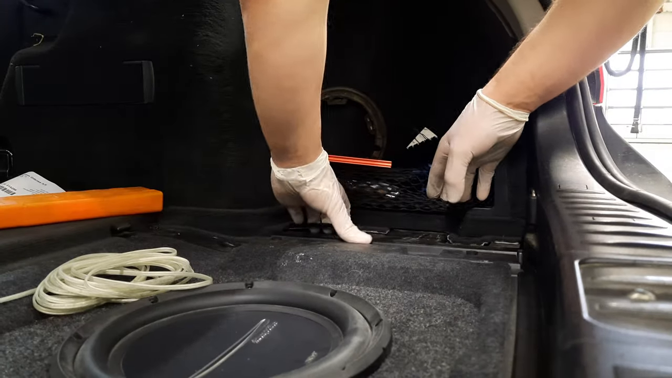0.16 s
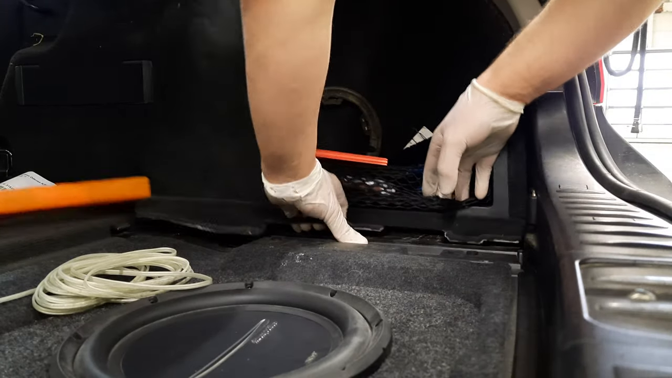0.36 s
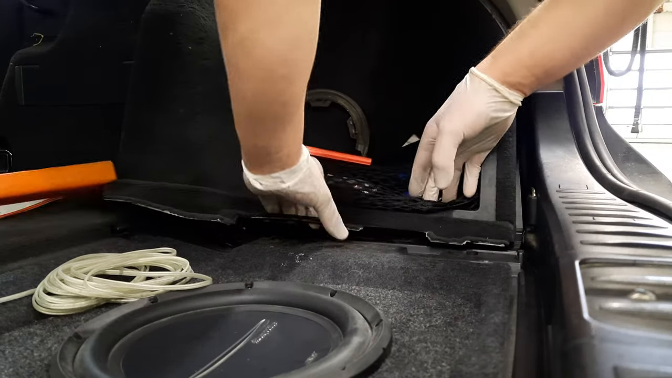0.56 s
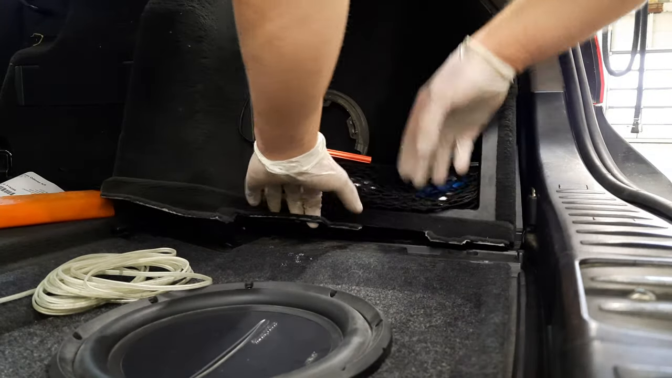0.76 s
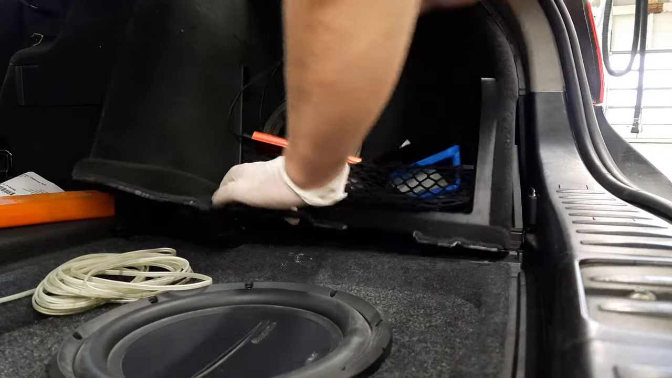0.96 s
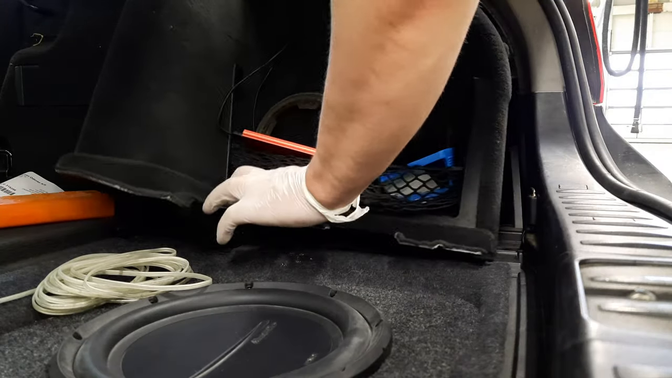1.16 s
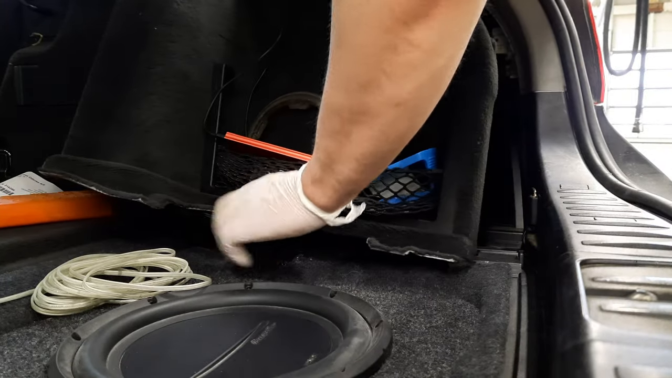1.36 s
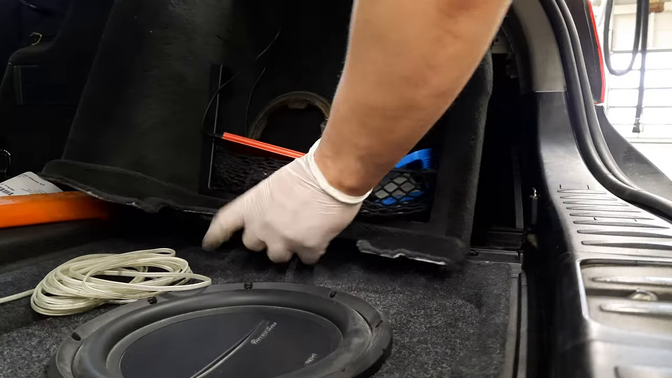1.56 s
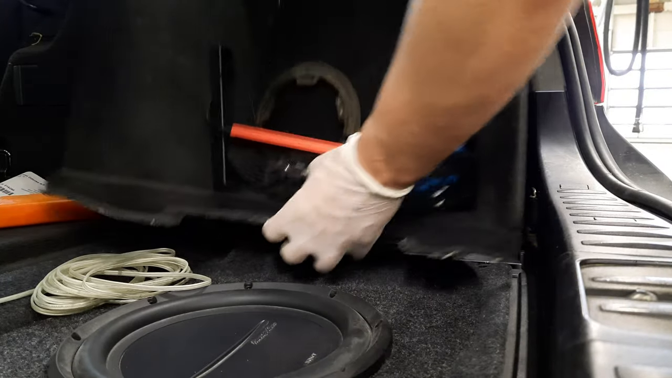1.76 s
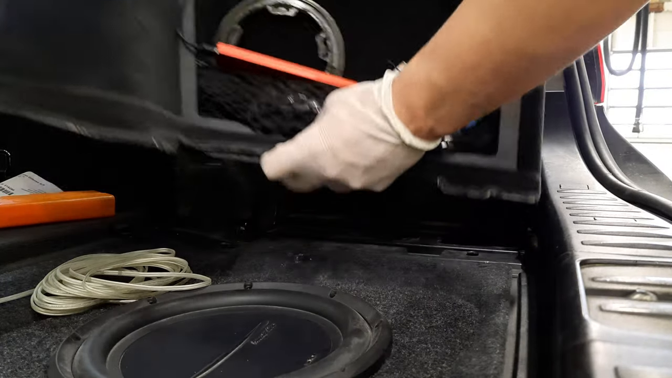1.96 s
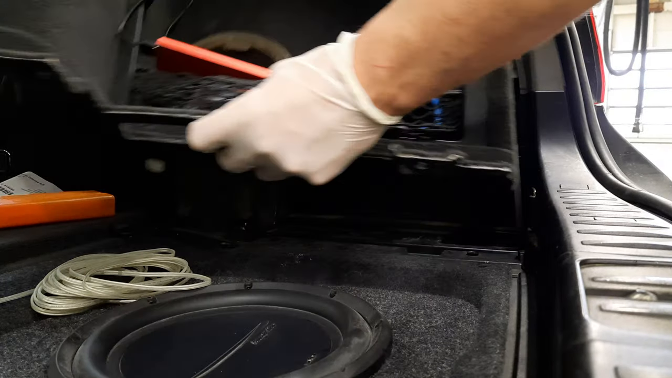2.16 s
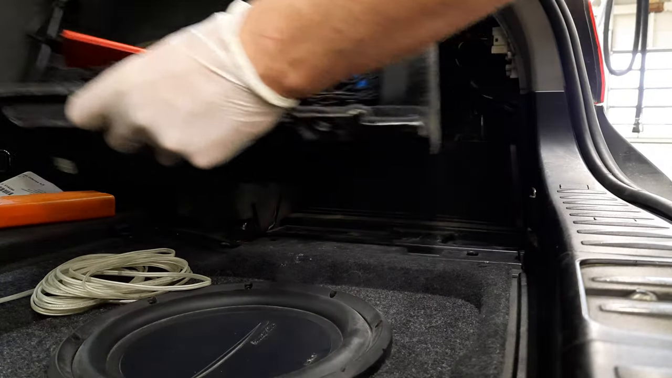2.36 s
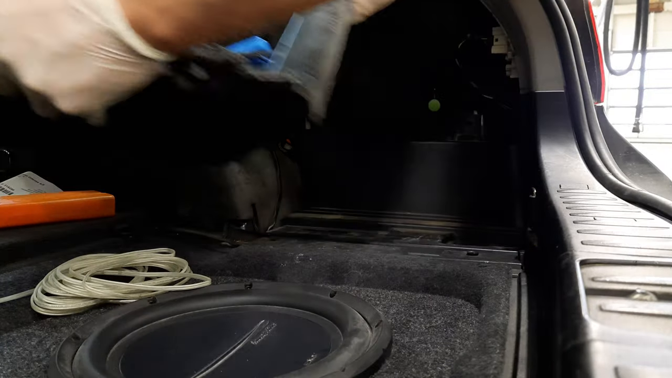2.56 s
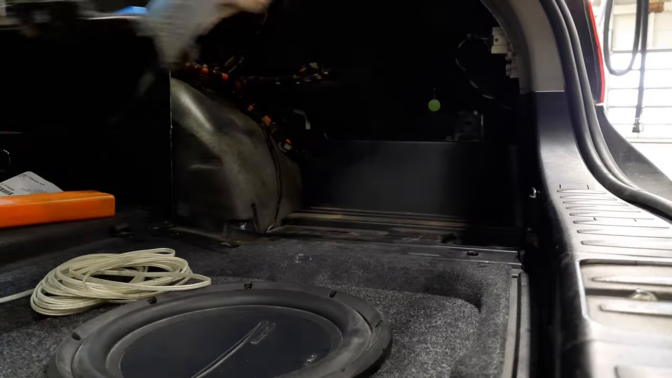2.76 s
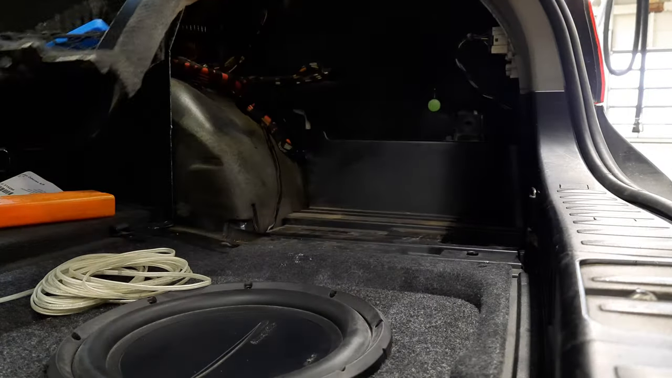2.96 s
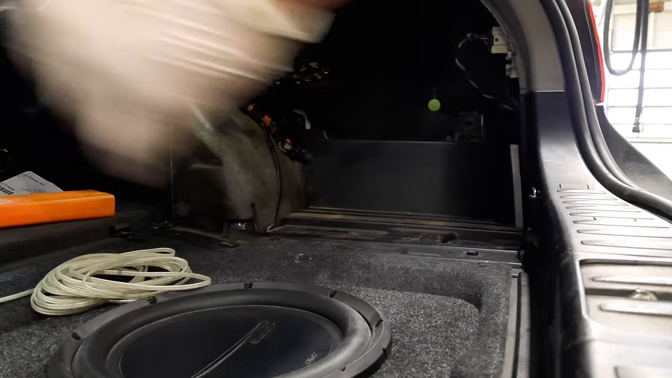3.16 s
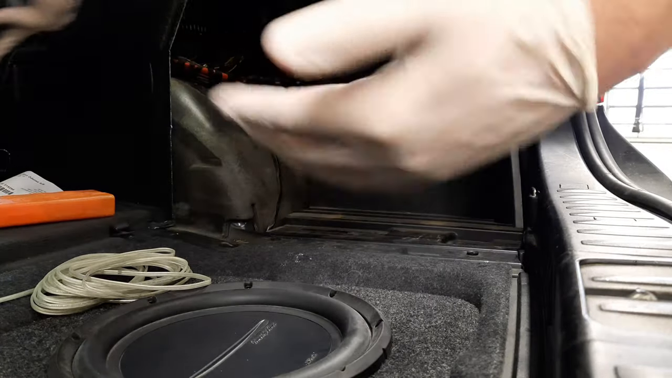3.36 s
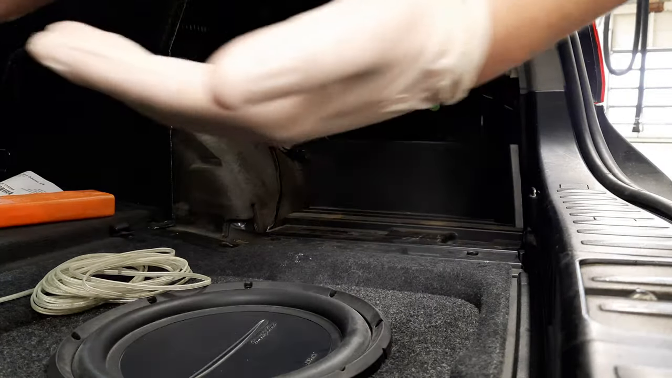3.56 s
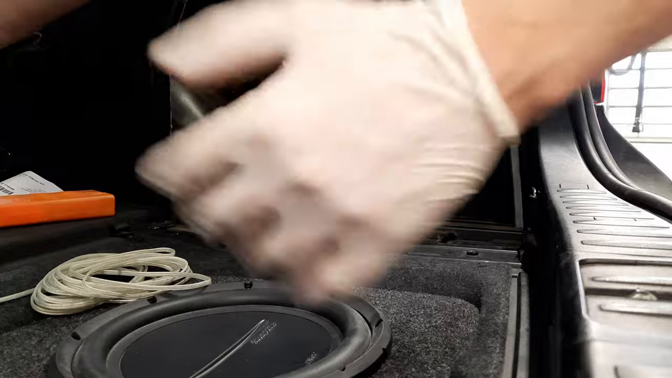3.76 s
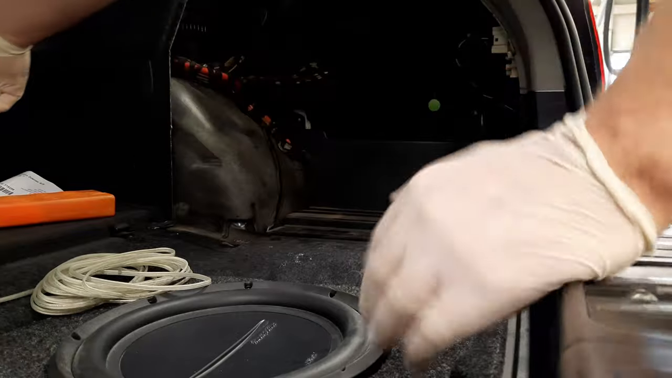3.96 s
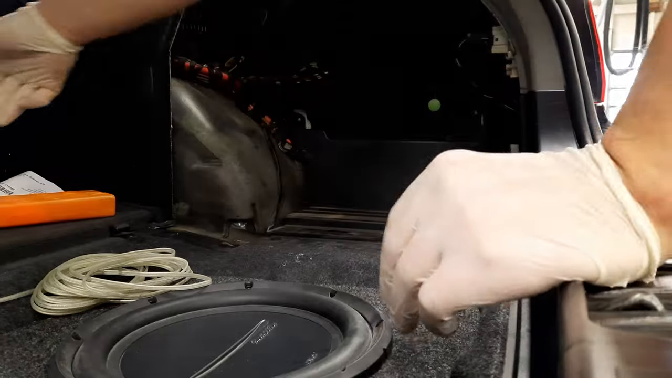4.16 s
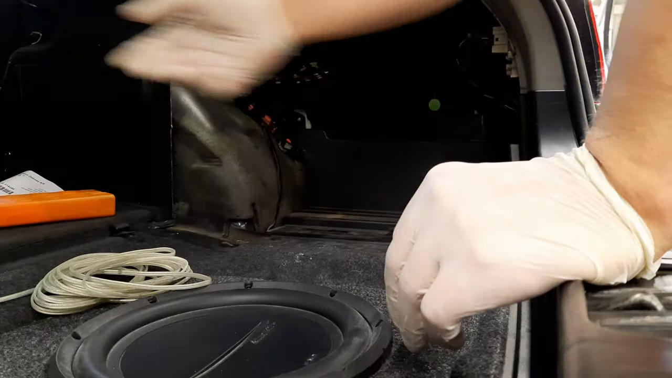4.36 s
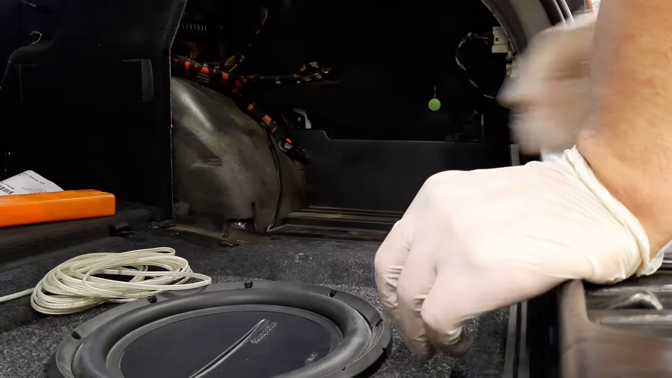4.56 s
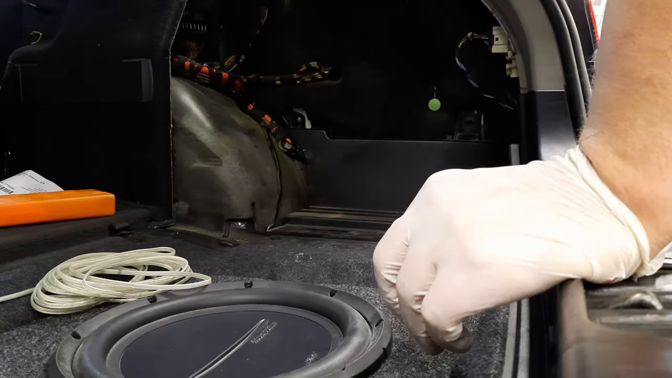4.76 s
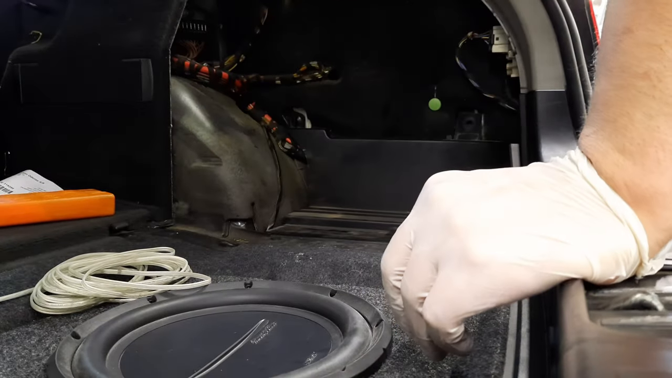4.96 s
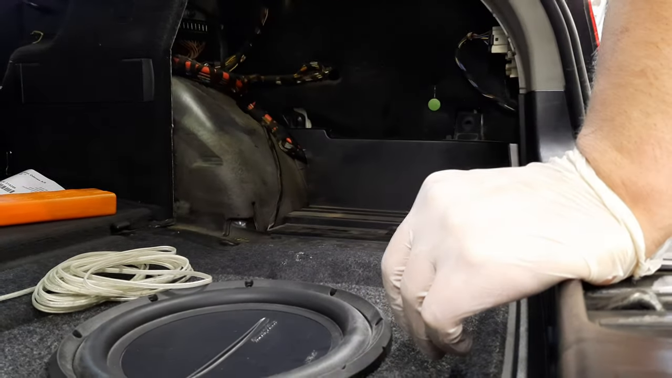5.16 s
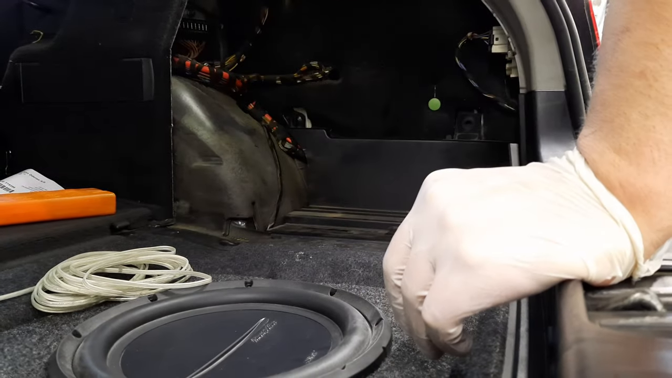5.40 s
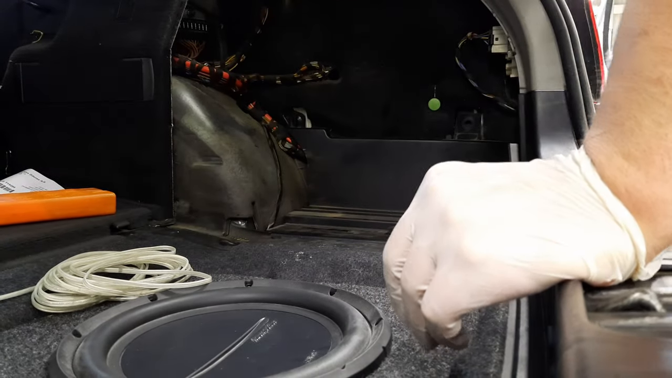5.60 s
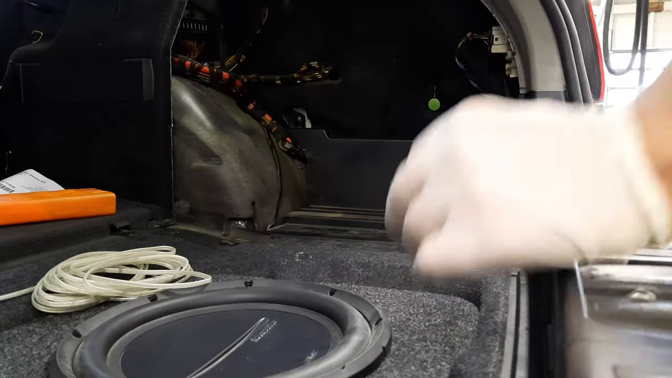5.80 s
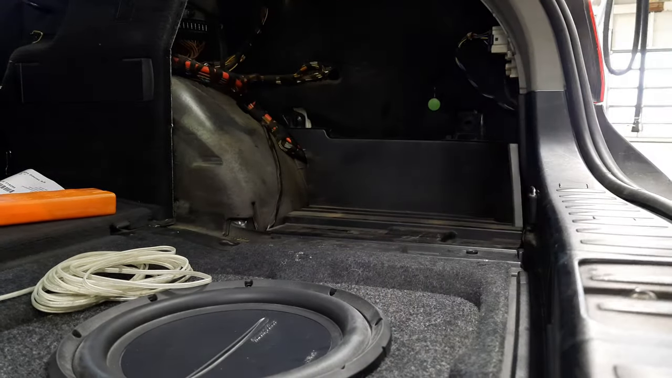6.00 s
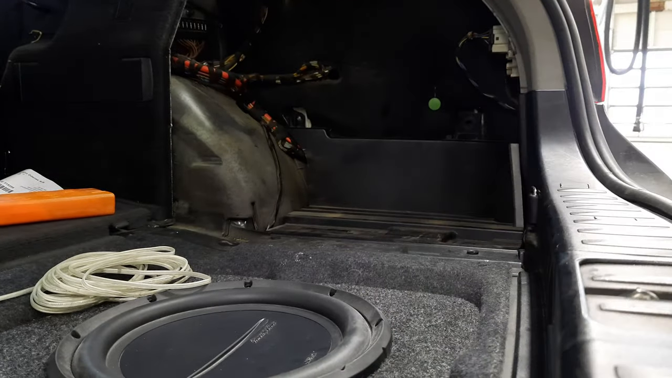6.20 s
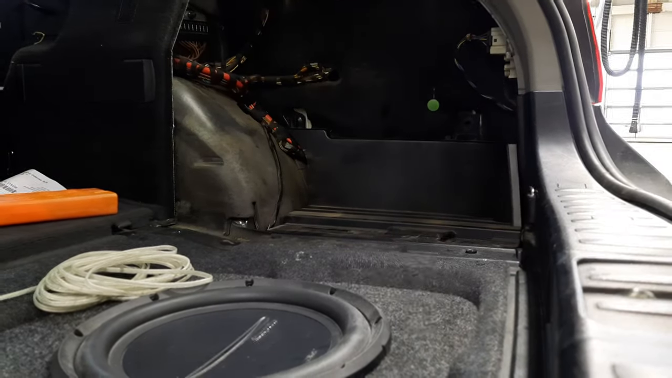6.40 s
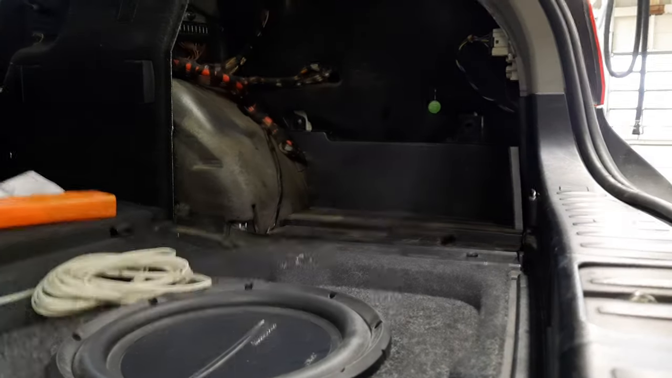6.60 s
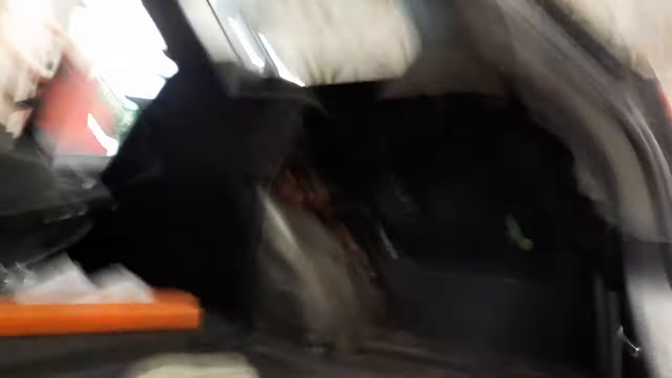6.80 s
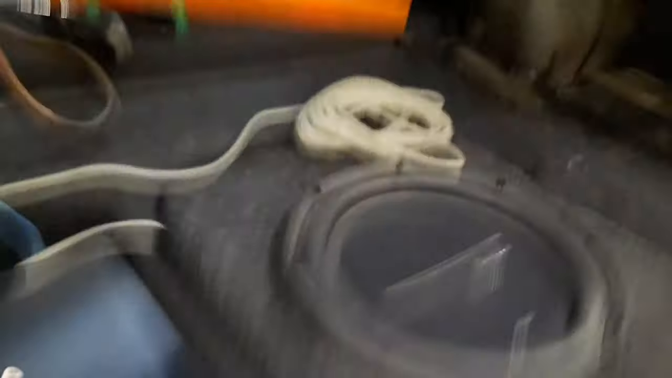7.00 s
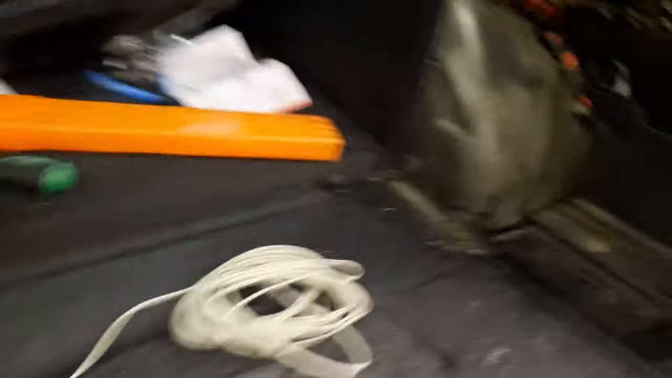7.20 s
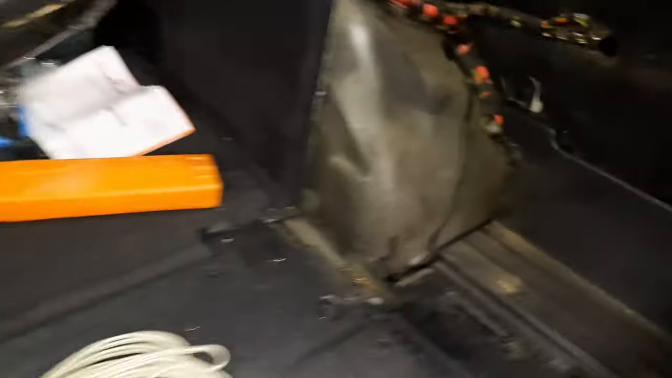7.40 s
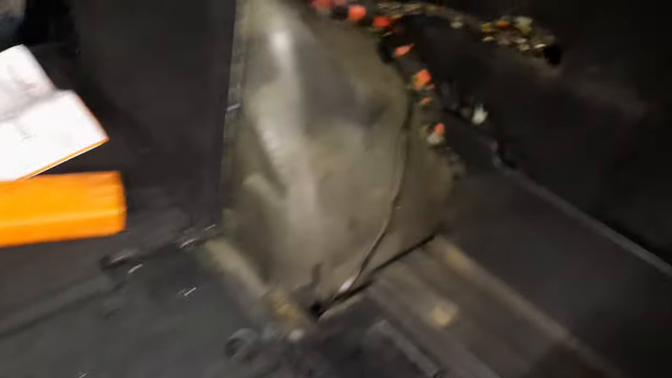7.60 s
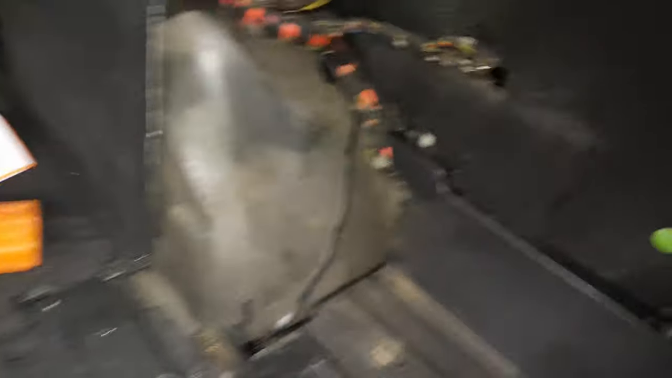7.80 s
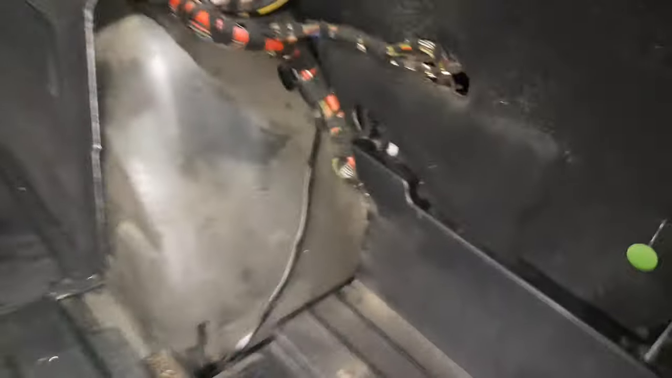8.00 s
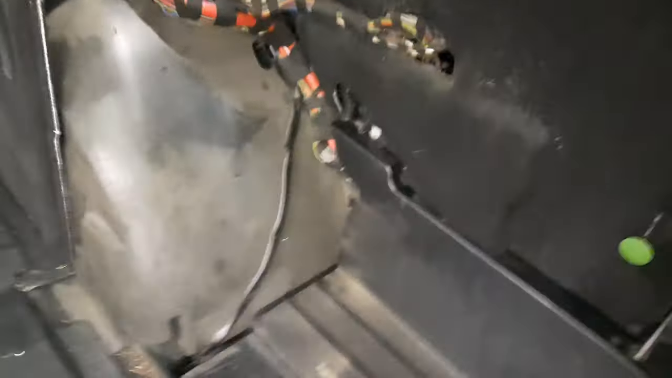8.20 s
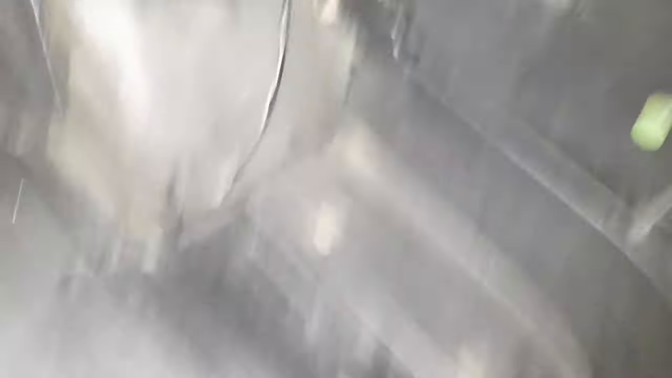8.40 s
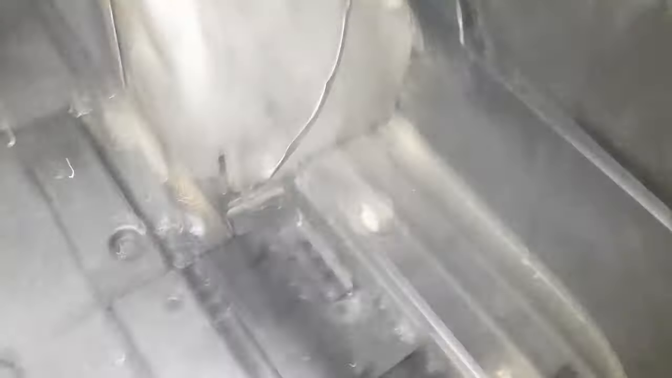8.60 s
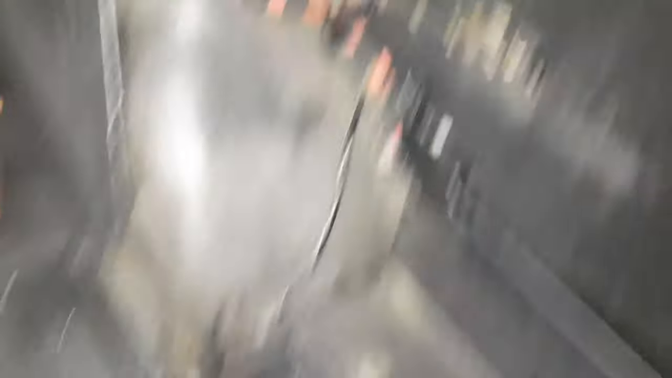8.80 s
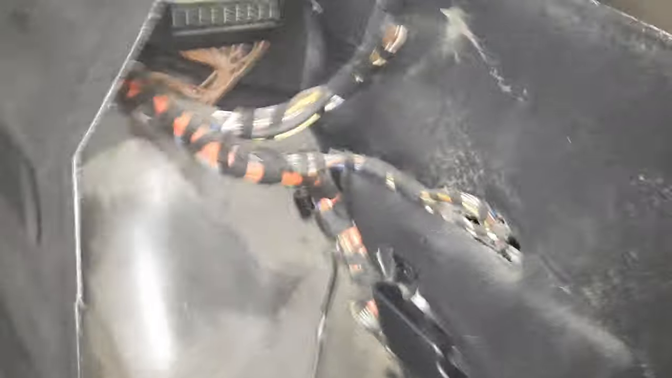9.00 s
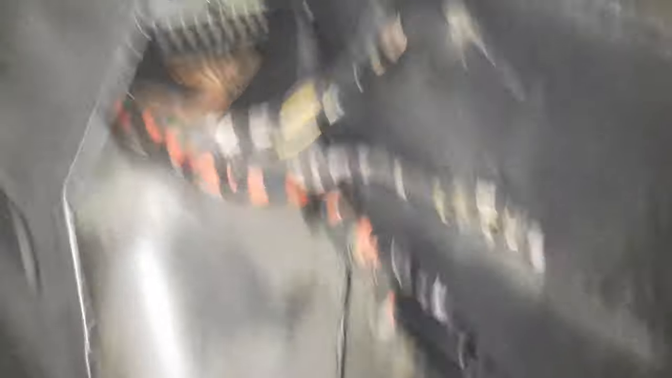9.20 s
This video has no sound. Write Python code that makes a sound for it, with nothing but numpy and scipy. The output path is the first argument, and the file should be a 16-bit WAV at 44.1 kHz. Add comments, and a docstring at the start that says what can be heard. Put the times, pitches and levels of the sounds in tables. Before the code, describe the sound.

Inside a car boot, a carpeted plastic panel is tugged loose with a flurry of hollow knocks, snapping clips and short scrapes. After a quieter moment it is put down with a thud and a clatter, and a few more knocks follow. Then fingers bump loudly and rub right on the microphone, mostly on the left. A low workshop drone runs underneath throughout.

```python
"""In a car boot, a carpeted plastic side panel is tugged loose, lifted out and put down.
Its knocks ring the floor, skin and rim; clips flick free, its edge scrapes, a glove brushes the carpet.
Then a phone is picked up: fingers bump its case and rub over its two microphone ports.
A low workshop drone resonates in the boot throughout."""
import sys
import numpy as np
from scipy import signal
from scipy.fft import rfft, irfft, next_fast_len
from scipy.io import wavfile
from scipy.ndimage import uniform_filter1d

SR = 44100
rng = np.random.default_rng(int(sys.argv[2]) if len(sys.argv) > 2 else 0)


def waveform_to_disk(signal):
    """Save audio, clipped to [-1, 1], as 16-bit WAV at the path in sys.argv[1]."""
    frames = np.transpose(np.atleast_2d(signal))
    scaled = np.clip(frames, -1, 1) * 32767
    samples = np.round(scaled).astype(np.int16)
    wavfile.write(sys.argv[1], SR, samples)


N = 407925
TIME = np.arange(N) / SR
HIT_TIME = np.arange(int(0.3 * SR)) / SR

# Modes of floor, panel skin, rim and clips: (frequency [Hz], level [dB], free t60 [s])
FLOOR_MODES = [(58, -12, 0.2), (76, 4, 0.16), (93, 2, 0.17), (111, 1, 0.14), (135, -1, 0.14),
               (164, 0, 0.09), (190, 1, 0.06), (222, 1, 0.06)]
SKIN_MODES = [(251.6, -2, 0.11), (312.3, 2.5, 0.13), (344.6, -5, 0.16), (396, -0.5, 0.065),
              (439, -2.5, 0.042), (486.4, -1.5, 0.077), (523, 4, 0.057), (595, 2.5, 0.084)]
RIM_MODES = [(697, 1, 0.079), (834, 8, 0.035), (891, 3, 0.069), (975, 3, 0.066), (1055, 6.5, 0.055),
             (1213, 2, 0.058), (1412, 3.5, 0.035), (1675, 1, 0.076)]
CLIP_MODES = [(1938, 16, 0.16), (2344, 8, 0.21), (2784, 11, 0.22), (3490, 12, 0.3), (3910, 5.5, 0.093),
              (4190, 13, 0.066), (5020, 16, 0.033), (5850, 3, 0.021), (7440, 25, 0.013), (7000, -2, 0.026)]
# Hard plastic snap: (frequency [Hz], density [dB])
SNAP_SPECTRUM = [(1000, -1), (1700, 3), (2500, 2.5), (3400, -2), (5000, -3.5), (7600, -8.5), (9300, -12.5),
                 (12500, -13), (16000, -16.5)]
# Position of the flexing skin: (time [s], left minus right [dB])
PANEL_PAN = [(0.5, 5.5), (1.7, 1.5), (3.7, 4), (4.05, 7), (5.1, 10), (5.8, 7.5)]
# Panel blows: (time [s], floor boom [dB], boom centre [Hz], skin flex [dB], flex centre [Hz],
# rim clack [dB], clack centre [Hz], edge snap [dB], snap tilt [dB/octave])
KNOCKS = [(0.0552, -30, 150, -25.5, 365, -34, 800, -31, 2.5),
          (0.252, -54, 171, -26.5, 312, -45, 700, -66, -14),
          (0.355, -29, 95, -27.5, 352, -35, 850, -39.5, 1), (0.39, -27, 90, -33, 400, -34, 850, -47, -4),
          (0.408, -26, 140, -23.5, 342, -32.5, 900, -27, -1), (0.478, -32, 130, -36, 477, -40, 800, -52, 2),
          (0.496, -20.5, 103, -34, 350, -44, 750, -46, 2), (0.586, -30, 95, -30.5, 543, -37, 760, -53, -8),
          (0.6304, -21.5, 165, -20, 350, -18.5, 1030, -27, -6.5),
          (0.634, -36, 190, -20, 600, -22.5, 1000, -34, -11), (0.656, -35, 170, -28, 320, -50, 800, -55, 2),
          (0.728, -15.5, 85, -17.5, 527, -26, 980, -29, -5),
          (0.7351, -18.5, 125, -29, 326, -32, 1100, -36.5, -1),
          (0.752, -25, 80, -30, 450, -32, 1100, -36.5, -2), (0.767, -25, 79, -33, 527, -41, 800, -52, -4),
          (0.79, -22.5, 76, -33.5, 486, -51, 800, -44, -1),
          (1.0132, -29, 141, -21, 308, -25, 704, -32.5, -3),
          (1.038, -23.5, 112, -27.5, 317, -51, 800, -60, -10),
          (1.055, -25, 120, -34.5, 380, -36, 1400, -50, -9),
          (1.072, -24, 115, -28.5, 324, -28.5, 1150, -40, -7),
          (1.379, -38, 120, -34.5, 335, -43, 800, -47, -10),
          (1.401, -25, 115, -27, 453, -34, 800, -33.5, -12),
          (1.546, -44, 150, -41.5, 317, -60, 765, -66, -10),
          (1.672, -28, 155, -19.5, 340, -35, 726, -42.5, -3.5),
          (1.679, -44, 190, -28.5, 500, -39.5, 800, -46, -1.5),
          (1.7, -37, 150, -30.5, 313, -57, 900, -60, -5),
          (1.753, -47, 170, -18, 273, -33, 760, -39.5, -4.5),
          (1.773, -30.5, 200, -27.5, 574, -32, 900, -42, -2.5),
          (2.567, -38.5, 110, -38.5, 302, -56, 750, -57, 1), (2.713, -47, 110, -44, 330, -51, 750, -47, 9),
          (2.745, -44, 110, -42, 368, -46, 800, -41.5, 5.5),
          (2.771, -55, 110, -37.5, 370, -45.5, 800, -43, 0.5),
          (2.837, -39, 110, -37.5, 320, -45, 750, -41, 4),
          (3.7165, -13.5, 117, -23, 245, -40.5, 700, -42, 2),
          (3.771, -16, 80, -39.5, 280, -45.5, 700, -59, -5),
          (3.792, -33, 125, -39, 500, -41, 796, -47, -0.5),
          (4.001, -48, 140, -39, 524, -41, 1100, -32.5, 2.5),
          (4.0077, -44, 140, -30.5, 405, -35.5, 900, -31.5, 5.5),
          (4.0106, -40, 200, -14.5, 303, -26, 850, -28, -2.5),
          (4.016, -50, 140, -21, 383, -26.5, 880, -31, -5), (4.04, -53, 140, -29, 310, -39.5, 750, -41, -6),
          (4.048, -38, 140, -28, 330, -29, 750, -40, -6), (4.056, -57, 140, -33, 400, -39, 900, -42, 2),
          (4.0641, -42, 140, -34, 400, -24.5, 950, -32.5, 1.5),
          (4.075, -48, 140, -31, 480, -33.5, 1000, -33, -5),
          (4.086, -30.5, 136, -20.5, 332, -24.5, 850, -33.5, 2),
          (4.107, -52, 140, -35.5, 350, -36.5, 800, -33.5, 1.5),
          (4.115, -55, 140, -36.5, 400, -39.5, 850, -36, 2),
          (4.1311, -48, 140, -43, 353, -31.5, 800, -36, -1.5),
          (4.154, -40, 190, -22.5, 336, -26.5, 900, -28.5, 1),
          (4.2778, -66, 187, -29, 456, -30, 910, -33, 2.5),
          (4.418, -69, 190, -29, 400, -29, 844, -28.5, -1.5),
          (5.02, -45, 180, -29.5, 338, -30, 800, -26.5, 3), (5.037, -55, 180, -38, 400, -39, 1100, -43, -3),
          (5.064, -54, 180, -30, 404, -30, 900, -29, 0), (5.0782, -52, 180, -40, 340, -34.5, 800, -30, 2),
          (5.18, -44, 190, -27, 326, -28.5, 795, -27, 1),
          (5.7398, -28, 185, -25, 403, -19, 960, -25.5, 2.5),
          (5.743, -38, 200, -12, 307, -36, 750, -36, -9), (5.765, -55, 180, -26, 310, -40.5, 750, -38, -3),
          (5.778, -50, 180, -41, 330, -32, 750, -33, -2), (5.798, -55, 180, -44, 380, -40, 800, -36, -9),
          (5.805, -48, 150, -28, 362, -30, 800, -33, 2.5), (5.825, -52, 150, -26, 347, -32, 800, -33.5, 2),
          (5.8402, -40, 150, -22, 312, -28, 860, -32, 0),
          (5.852, -39, 150, -29.5, 423, -33.5, 900, -38, -2),
          (5.859, -32.5, 150, -29, 308, -33, 750, -39, -6)]


def panel_knocks():
    """A blow shakes the floor, flexes the panel, rings its rim and snaps at the hard contact."""
    out = np.zeros((2, N))
    weak_mode_spectrum = [(400, 20.5), (650, 16), (1100, 6.5), (1700, 7.5), (2600, -33.5)]
    for s, boom_db, boom_hz, flex_db, flex_hz, clack_db, clack_hz, snap_db, tilt_db in KNOCKS:
        rim_noise, snap_noise = rng.standard_normal((2, 2, len(HIT_TIME)))
        boom = ring(FLOOR_MODES, focus(FLOOR_MODES, boom_hz, db_per_octave=12),
                    rise_s=0.0065, scatter_db=1.5, detune=0.039, apart_hz=610, disorder=0.32)
        flex = ring(SKIN_MODES, focus(SKIN_MODES, flex_hz, db_per_octave=20.5),
                    rise_s=0.0012, scatter_db=1.5, detune=0.025, apart_hz=950, disorder=0.27)
        rim = ring(RIM_MODES, focus(RIM_MODES, clack_hz, db_per_octave=9.5),
                   rise_s=0.00098, scatter_db=0, detune=0.028, apart_hz=1370)
        weak_modes = colour(rim_noise, weak_mode_spectrum, alike_hz=874)
        weak_modes *= fade(rise_s=0.00052, t60_s=0.14, tail_db=-15, tail_t60_s=0.19)
        clack = at_level(at_level(rim, 0) + at_level(weak_modes, -7), clack_db)
        snap = at_level(edge_snap(snap_noise, tilt_db), snap_db)
        boom = at_level(boom * decay(0.45), boom_db, span_s=0.11)  # damped by the carpet
        flex = at_level(flex * decay(0.4), flex_db, span_s=0.065)  # damped by the hand
        # the skin gives way later in a soft blow, where flex outweighs clack
        give_s = 0.00685 * np.clip((flex_db - clack_db) / 9, 0, 1) ** 2
        add(out, s, pan(boom, 3.4) + pan(clack, 7) + pan(snap, 2.2))
        add(out, s + give_s, pan(flex, np.interp(s, *np.transpose(PANEL_PAN))))
    return out


def edge_snap(noise, tilt_db):
    """A struck edge cracks, skids and catches twice more, and rings the clips that it damps."""
    crack = colour(noise, SNAP_SPECTRUM, alike_hz=700, tilt_db=tilt_db)
    crack *= fade(rise_s=0.0018, t60_s=0.013, tail_db=-20, tail_t60_s=0.08)
    clip_octaves = np.log2(np.array(CLIP_MODES)[:, 0])
    ping = ring(CLIP_MODES, tilt_db * clip_octaves,
                rise_s=0.0036, scatter_db=3, detune=0.054, apart_hz=1550)
    skid_lags_s = 0.0098 * rng.uniform(0.2, 1, 2)
    skids = sum(np.pad(crack, ((0, 0), (int(s * SR), 0)))[:, :len(HIT_TIME)] for s in skid_lags_s)
    return at_level(crack + undb(-14) * skids, -0.3) + at_level(ping * decay(0.045), -6.5)


# Modes of a clip's prong: (frequency [x pitch], level [dB], t60 [s])
PRONG_MODES = [(1, 11, 0.036), (1.5, -12, 0.032), (2.8, -26, 0.015)]
# Clips flicking free: (time [s], level [dB], pitch [Hz], prong re click [dB])
FLICKS = [(0.305, -39, 3700, -17), (0.534, -29.5, 2680, -11), (0.792, -35.5, 3770, -6),
          (1.12, -51, 2100, -5), (1.509, -43, 2950, -23), (1.646, -44.5, 2980, -19),
          (2.125, -54.5, 7100, -10), (2.58, -53.5, 2670, 0), (2.8362, -38, 2530, -3),
          (4.182, -66, 5800, -5), (5.707, -43, 1290, -10), (5.9133, -33.5, 2570, -2.5),
          (6.351, -56, 2640, -21), (8.551, -46, 3000, -7)]


def clip_flicks():
    """A freed clip cracks, rings briefly at its own pitch and shakes the edges around it."""
    out = np.zeros((2, N))
    for s, db, hz, prong_db in FLICKS:
        crack_noise, body_noise = rng.standard_normal((2, 2, len(HIT_TIME)))
        crack = colour(crack_noise, SNAP_SPECTRUM, alike_hz=700, tilt_db=4.5 * np.log2(hz / 4000))
        crack *= fade(rise_s=0.0002, t60_s=0.0091, tail_db=-13.5, tail_t60_s=0.076)
        body = colour(body_noise, peaks=[(hz, 0.81 * hz, 0)], alike_hz=700)
        body *= fade(rise_s=0.00091, t60_s=0.077, tail_db=-18, tail_t60_s=0.09)
        ping = ring(CLIP_MODES, focus(CLIP_MODES, hz, db_per_octave=4),
                    rise_s=0.00064, scatter_db=1.5, detune=0.04, apart_hz=1445)
        ping *= np.exp(-HIT_TIME / 0.011)
        modes = [(hz * ratio, mode_db, t60_s) for ratio, mode_db, t60_s in PRONG_MODES]
        prong = ring(modes, 0, rise_s=0.00032, scatter_db=1, detune=0.007, apart_hz=4970)
        click = at_level(crack, -3) + at_level(body, -4.5) + at_level(ping, -16)
        add(out, s, pan((click + at_level(prong, prong_db)) * undb(db), 4))
    return out


# Edge scrape, carpet hiss and loose-edge rattle: (frequency [Hz], density [dB])
SCRAPE_SPECTRUM = [(60, -12), (95, 1.5), (160, 8.5), (230, 0), (330, 3.5), (480, 2.5), (620, 0),
                   (1000, -10), (1800, -26), (3500, -43)]
CARPET_SPECTRUM = [(600, 1), (1300, 2.5), (2400, 4.5), (3500, -4.5), (5000, -6.5), (7500, -11), (9500, -21),
                   (14000, -15), (16000, -31)]
RATTLE_SPECTRUM = [(300, 5), (900, 22), (1800, 1), (4000, -31), (9000, -31), (16000, -25)]
# Pulls over the carpet: (start [s], length [s], scrape [dB], hiss [dB])
TUGS = [(0, 0.3, -45.5, -49.5), (0.231, 0.032, -40, -67), (0.348, 0.068, -29, -34.5),
        (0.447, 0.092, -39, -46.5), (0.554, 0.081, -29.5, -43), (0.711, 0.098, -37.5, -49),
        (0.925, 0.08, -48.5, -57), (1.01, 0.076, -33.5, -47), (1.318, 0.19, -46.5, -62),
        (1.624, 0.081, -40, -51.5), (2.648, 0.2, -48, -57), (3.996, 0.11, -31, -41.5),
        (5.788, 0.1, -35.5, -49)]


def panel_drag():
    """With each tug the panel's edge judders and rattles along while the carpet pile hisses."""
    scrape_gain, hiss_gain = np.zeros((2, N))
    for start_s, length_s, scrape_db, hiss_db in TUGS:
        pull = hold(TIME - start_s, length_s, rise_s=0.018, t60_s=0.25)
        scrape_gain += pull * undb(scrape_db)
        hiss_gain += pull * undb(hiss_db)
    scrape = colour(slips(per_s=1500, spread_db=-1.1), SCRAPE_SPECTRUM, alike_hz=770)
    scrape *= scrape_gain * flutter(depth_db=1.5, per_s=50)
    hiss = colour(rng.standard_normal((2, N)), CARPET_SPECTRUM, alike_hz=700)
    hiss *= hiss_gain * flutter(depth_db=2, per_s=60)
    contacts = np.abs(slips(per_s=83, spread_db=2)[0])
    chatter = signal.fftconvolve(contacts, decay(0.058))[:N]
    rattle = colour(rng.standard_normal((2, N)) * chatter, RATTLE_SPECTRUM, alike_hz=800)
    rattle *= hiss_gain * undb(-1.5)
    return pan(scrape + rattle, 5.7) + pan(hiss, 0.47)


# Finger rasp: (frequency [Hz], density [dB])
RASP_SPECTRUM = [(700, -5), (1500, 2.5), (2700, -1), (4000, -0.5), (5500, 2), (7500, -1.5), (9300, -15.5),
                 (12500, -6), (16000, -13)]
# Bumps on the phone: (time [s], bump [dB], pitch [Hz], click [dB], left minus right [dB])
TAPS = [(6.6732, -19, 350, -19.5, 28), (6.677, 1.5, 169, -10, 45), (6.684, -2.5, 382, -8.5, 43),
        (6.6911, -6, 267, -14, 40), (6.697, -12, 63, -50, 36), (6.7188, -28, 1150, -21.5, 28),
        (6.7702, -22, 446, -25, 29), (6.826, -18, 129, -40, 18), (6.8748, -17, 500, -23, 11),
        (6.8927, -14.5, 1500, -29, 30), (6.8978, -5.5, 1180, -11.5, 38), (6.8994, -6.5, 1510, -29, 38),
        (6.912, -2, 376, -37, 41), (6.9155, -13, 620, -37, 39), (6.9614, -21, 470, -31, 30),
        (7.057, -30, 700, -26, -16), (7.202, -38, 5500, -35, -10), (7.317, -32, 7000, -26, 15),
        (7.6062, -16, 556, -24, 33), (7.695, -29, 440, -28, 24), (7.73, -21, 312, -28, 34),
        (7.7692, -26, 517, -39, 16), (8.0778, -25.5, 3630, -21, 4), (8.181, -22, 3200, -39, 4),
        (8.199, -27, 2380, -30, -1), (8.234, -30, 1510, -48, 2), (8.272, -26, 824, -36, 20),
        (8.338, -27, 930, -40, 20), (8.33, -13, 12100, -30, 26), (8.3612, -25, 483, -30, 21),
        (8.407, -25, 380, -46, 28), (8.4364, -24, 473, -38, 26), (8.468, -10, 380, -20.5, 29),
        (8.481, -2.5, 465, -34, 48), (8.604, -22.5, 5500, -23, -10), (8.6334, -18, 327, -25, 22),
        (8.6791, -18, 290, -36, 27), (8.688, -17, 293, -36, 27), (8.757, -35, 1000, -35, 10),
        (8.784, -19, 92, -19, 6), (8.826, -16, 89.5, -20, 12), (8.845, -26, 105, -18, 17),
        (8.9425, -8.5, 4350, -8, -4), (8.9491, -13.5, 550, -12.5, 30), (9.022, -47, 4170, -18, 4),
        (9.175, -25, 3500, -22, 16), (9.226, -25, 1000, -14.5, 30)]


def finger_taps():
    """A bump swings the air in a port for a cycle or two; the case clicks and rings briefly."""
    out = np.zeros((2, N))
    for s, bump_db, hz, click_db, left_db in TAPS:
        case_noise, spray_noise = rng.standard_normal((2, 2, len(HIT_TIME)))
        cycles = hz * HIT_TIME
        swing = (1 - np.exp(-cycles / 0.24)) ** 2 * np.exp(-cycles / 0.54)
        bump = np.gradient(-np.sin(2 * np.pi * cycles) * swing)
        bump /= np.abs(bump).max()
        case = colour(case_noise, peaks=[(hz, 0.5 * hz, 0)], alike_hz=150)
        case *= fade(rise_s=0.00023, t60_s=0.033 * (hz / 400) ** -0.35, tail_db=-39, tail_t60_s=0.17)
        # a nail or grain of grit: one spike, then a spray of crackle
        spike = np.cos(2 * np.pi * 6500 * HIT_TIME) * np.exp(-HIT_TIME / 0.000041)
        spray = colour(spray_noise, RASP_SPECTRUM, alike_hz=300, tilt_db=-4.5)
        spray *= fade(rise_s=0.0001, t60_s=0.004, tail_db=-11.5, tail_t60_s=0.065)
        tap = undb(bump_db) * (bump + undb(-7) * case) + undb(click_db) * (spike + undb(-7) * spray)
        add(out, s, pan(tap / np.sqrt(2), left_db))
    return out


# Fingertip hiss and case rumble: (frequency [Hz], density [dB])
FINGER_SPECTRUM = [(600, 2.5), (1500, 6.5), (3500, 4), (6500, -0.5), (8000, -1.5), (9300, -10),
                   (12000, -0.5), (16000, -7.5)]
CASE_SPECTRUM = [(40, 6), (90, 10.5), (200, 3.5), (330, 11), (700, -7), (1100, -6), (2200, -29.5)]
# Left-port strokes: (start [s], length [s], hiss [dB], hollow [dB], hollow pitch [Hz], rumble [dB])
STROKES = [(6.728, 0.019, -53, -41, 1500, -32.5), (6.775, 0.04, -40, -38.5, 1600, -33),
           (6.807, 0.04, -36.5, -26, 1570, -31.5), (6.853, 0.07, -40, -38.5, 1670, -29.5),
           (6.915, 0.052, -34.5, -33, 1440, -29), (6.983, 0.059, -48, -50, 1270, -32.5),
           (7.046, 0.041, -40, -46, 1890, -54), (7.084, 0.021, -37.5, -58, 2000, -33),
           (7.132, 0.016, -47, -60, 1600, -42), (7.15, 0.038, -34, -53, 1580, -39.5),
           (7.217, 0.056, -49.5, -44, 1340, -43), (7.284, 0.026, -45.5, -62, 1690, -44.5),
           (7.349, 0.46, -57, -61, 1290, -46)]


def finger_strokes():
    """A stroke hisses over the left port and rings the gap under the finger; the right hears little."""
    out = np.zeros((2, N))
    leak_db, far_rasp_db = -41, -18.5
    hiss = colour(slips(per_s=22000, spread_db=1), FINGER_SPECTRUM, alike_hz=200)[0]
    rasp = colour(slips(per_s=12000, spread_db=-3), RASP_SPECTRUM, alike_hz=200)[1]
    rumble = colour(slips(per_s=2500, spread_db=0), CASE_SPECTRUM, alike_hz=120)[0]
    grit = slips(per_s=8000, spread_db=2)
    judder = flutter(depth_db=2.4, per_s=170)
    for start_s, length_s, hiss_db, hollow_db, hollow_hz, rumble_db in STROKES:
        i = int(start_s * SR)
        span = slice(i, i + SR // 2)
        press = hold(TIME[span] - TIME[i], length_s, rise_s=0.017, t60_s=0.17)
        hollow = finger_gap(grit[:, span], hollow_hz) * undb(hollow_db)
        left = (hiss[span] * undb(hiss_db) + hollow) * judder[span] + rumble[span] * undb(rumble_db)
        right = left * undb(leak_db) + rasp[span] * undb(hiss_db + far_rasp_db)
        add(out, start_s, press * np.array([left, right]))
    return out


# Finger catching on the case: (frequency [Hz], density [dB])
CATCH_SPECTRUM = [(150, -8), (330, -6), (700, 7), (1300, -10), (4000, -30)]
# Shifting grip: (time [s], hiss [dB], hiss left minus right [dB], rumble [dB])
REGRIP = [(8.1, -55.5, 25, -60), (8.3, -53, 3, -47), (8.45, -45, 4.5, -38), (8.52, -51, 5, -49),
          (8.58, -52.5, 0, -53), (8.63, -38, -4, -36.5), (8.72, -44, -5, -41), (8.85, -38.5, -5, -36.5),
          (8.91, -42, 4, -40), (9.0, -48.5, 4, -43), (9.17, -42.5, 6.5, -41.5), (9.25, -36.5, 15, -26)]


def finger_rub():
    """The grip shifts: each port hears its own gritty hiss; fingers catch and the case rumbles."""
    hiss_db, left_db, rumble_db = curves(REGRIP)
    touching = uniform_filter1d((TIME >= REGRIP[0][0]).astype(float), size=2000)
    light = colour(slips(per_s=14000, spread_db=3.5), FINGER_SPECTRUM, alike_hz=200)[0]
    hollow = finger_gap(slips(per_s=4400, spread_db=3), hz=1170)
    # a firm finger shakes the case more and turns light hiss into hollow scrape
    firmness = np.clip(0.5 + 0.05 * (rumble_db + 24), 0.08, 0.7)
    left = np.sqrt(1 - firmness) * light + np.sqrt(firmness) * hollow
    left *= flutter(depth_db=1.4, per_s=80)
    right = colour(slips(per_s=9000, spread_db=3), RASP_SPECTRUM, alike_hz=201)[1]
    right *= flutter(depth_db=3.9, per_s=64)
    hiss = pan(np.array([left, right]), left_db) * undb(hiss_db)
    rumble = colour(slips(per_s=2500, spread_db=3), CASE_SPECTRUM, alike_hz=120)
    rumble *= flutter(depth_db=2, per_s=60)
    catches = colour(slips(per_s=100, spread_db=2), CATCH_SPECTRUM, alike_hz=300) * undb(-7)
    return touching * (hiss + pan((rumble + catches) * undb(rumble_db), 9.2))


# Resonances between finger and port: (frequency [x pitch], width [x pitch], level [dB])
GAP_PEAKS = [(0.55, 0.2, 2.5), (0.92, 0.3, 1.5), (1.5, 0.45, -1), (3.6, 1.6, -12)]


def finger_gap(grit, hz):
    """Friction rings the small hollow between finger and port."""
    peaks = [(hz * ratio, hz * width, db) for ratio, width, db in GAP_PEAKS]
    return colour(grit, peaks=peaks, alike_hz=200)[0]


# Glove friction: (frequency [Hz], density [dB])
GLOVE_SPECTRUM = [(1500, 0), (2800, -2.5), (4800, -3), (7500, -5), (9300, -16), (13000, -12), (16000, -22)]
# Passes over carpet and sill: (start [s], length [s], level [dB])
BRUSHES = [(1.107, 0.8, -60), (3.677, 0.2, -53.5), (4.733, 0.24, -53), (6.334, 0.043, -52.5),
           (6.4, 0.32, -60)]


def glove_brushes():
    """Thin rubber drags over the pile; each pass swells and fades softly."""
    touch = sum(np.sin(np.pi * np.clip((TIME - start_s) / length_s, 0, 1)) * undb(db)
                for start_s, length_s, db in BRUSHES)
    friction = colour(slips(per_s=12000, spread_db=4.5), GLOVE_SPECTRUM, alike_hz=700)
    return friction * touch * flutter(depth_db=1.5, per_s=38)


# Boot resonances: (frequency [Hz], width [Hz], level [dB])
BOOT_PEAKS = [(57.3, 19, -8), (91.9, 17, 1.5), (140.8, 11.9, 2.5), (280.5, 17.3, -8.5), (318.5, 75, -10.5)]
# Drone swell: (time [s], level [dB])
DRONE_LEVEL = [(0, -36.5), (1.5, -42), (3, -41.5), (4.7, -42), (6.6, -42.5), (7.2, -45.5), (7.6, -48),
               (8.2, -46.5), (8.6, -42.5), (9.25, -46)]
# Workshop air: (frequency [Hz], density [dB])
AIR_SPECTRUM = [(25, -13), (60, -22), (110, -22), (190, -11), (330, -9.5), (480, -13), (620, -13.5),
                (980, -13), (1180, -21.5), (1420, -14.5), (1650, -18.5), (2200, -17.5), (3300, -25),
                (4600, -23), (6200, -29.5), (8200, -31.5), (9000, -39.5), (10300, -35.5), (11200, -30.5),
                (13500, -35), (14300, -26), (15000, -34), (16000, -43)]


def workshop():
    """A drone booms in the hollow boot over a soft wash of air that partly follows its swell."""
    drone_db, = curves(DRONE_LEVEL)
    drone = colour(rng.standard_normal((2, N)), peaks=BOOT_PEAKS, alike_hz=530) * undb(drone_db)
    wash = boot_walls(rng.standard_normal((2, N)), echo_db=-19, longest_s=0.0091)
    air_db = -50.5 + 0.4 * (drone_db - drone_db[0])
    air = colour(wash, AIR_SPECTRUM, alike_hz=506) * undb(air_db) * flutter(depth_db=0.018, per_s=3.2)
    return pan(drone, -1.4) + pan(air, -1.6)


def boot_walls(x, echo_db, longest_s, count=10):
    """Near walls add early echoes that ripple the spectrum differently at each port."""
    lags = (rng.uniform(0.1, 1, (2, count)) * longest_s * SR).astype(int)
    echoes = [sum((-1) ** k * np.roll(port, lag) for k, lag in enumerate(port_lags))
              for port, port_lags in zip(x, lags)]
    return unit_rms(x + undb(echo_db) * np.array(echoes))


def ring(modes, contact_db, rise_s, scatter_db, detune, apart_hz, disorder=1):
    """Damped modes weighted by contact and chance; higher modes reach the ports out of step."""
    hz, db, t60_s = np.transpose(modes)
    size, shift, phase, lag = rng.standard_normal((4, len(hz)))
    poles = 2j * np.pi * hz * (1 + detune * shift) - np.log(1000) / t60_s
    port_phases = np.pi * disorder * phase + np.outer([1, -1], lag * hz / apart_hz)
    weights = undb(db + contact_db + scatter_db * size) * np.exp(1j * port_phases)
    return (weights @ np.exp(np.outer(poles, HIT_TIME))).imag * (1 - np.exp(-HIT_TIME / rise_s))


def focus(modes, hz, db_per_octave):
    """Mode weights in dB: the place of contact favours those near hz."""
    return -db_per_octave * np.abs(np.log2(np.array(modes)[:, 0] / hz))


def slips(per_s, spread_db):
    """Two trains of tiny stick-slip releases, random in time and size."""
    sizes = undb(spread_db * np.minimum(rng.exponential(size=(2, N)), 5))
    return (rng.random((2, N)) < per_s / SR) * sizes * rng.standard_normal((2, N))


def colour(x, spectrum=None, *, alike_hz, tilt_db=0, peaks=None):
    """Shape two noises by a spectrum or peaks, at rms 1; long waves reach both ports alike."""
    size = next_fast_len(x.shape[1])
    f = np.arange(size // 2 + 1) * SR / size + 1
    if peaks is None:
        hz, db = np.transpose(spectrum)
        octaves = np.log2(np.maximum(f, hz[0]) / hz[0])
        low_cut = np.minimum(f / hz[0], 1) ** 2
        gain = undb(np.interp(np.log(f), np.log(hz), db) + tilt_db * octaves) * low_cut
    else:
        gain = sum(undb(db) / (1 + ((f - hz) / width) ** 2) ** 2 for hz, width, db in peaks)
    likeness = 1 / (1 + (f / alike_hz) ** 2)
    mid, side = rfft(x, size) * gain * np.sqrt([1 + likeness, 1 - likeness])
    return unit_rms(irfft(np.array([mid + side, mid - side]), size)[:, :x.shape[1]])


def flutter(depth_db, per_s):
    """A gain that glides between random levels."""
    step = int(SR / per_s)
    levels = np.repeat(rng.standard_normal(N // step + 1), step)[:N]
    return undb(0.9 * depth_db * uniform_filter1d(levels, step))


def decay(t60_s, t=HIT_TIME):
    """Exponential fall, 60 dB in t60_s."""
    return undb(-60 * t / t60_s)


def fade(rise_s, t60_s, tail_db, tail_t60_s):
    """Quick build-up between the boot's walls, fast decay, then a faint room tail."""
    return (1 - np.exp(-HIT_TIME / rise_s)) * (decay(t60_s) + undb(tail_db) * decay(tail_t60_s))


def hold(t, length_s, rise_s, t60_s):
    """A force builds up, holds until length_s and dies away."""
    return np.clip(t / rise_s, 0, 1) * decay(t60_s, np.clip(t - length_s, 0, 2))


def at_level(x, db, span_s=0.027):
    """Scale a blow so that its first span_s hold the energy of 20 ms at the given level."""
    energy = np.sum(x[:, :int(span_s * SR)] ** 2)
    return x * undb(db) / np.sqrt(energy / (2 * SR * 0.02))


def undb(db):
    """Decibels to gain."""
    return 10 ** (np.asarray(db) / 20)


def unit_rms(x):
    """Scale to rms 1."""
    return x / np.sqrt(np.mean(x ** 2))


def curves(table):
    """Table columns, interpolated linearly in time."""
    s, *columns = np.transpose(table)
    return [np.interp(TIME, s, column) for column in columns]


def pan(x, left_db):
    """Lean left at constant power."""
    gains = undb(np.array([left_db, -left_db]) / 2).reshape(2, -1)
    return x * gains / np.sqrt(np.mean(gains ** 2, axis=0))


def add(out, s, x):
    """Mix x in from time s."""
    i = max(int(s * SR), 0)
    out[:, i:i + x.shape[1]] += x[:, :N - i]


def scene():
    """Panel, hands and workshop together."""
    panel_work = panel_knocks() + clip_flicks() + panel_drag() + glove_brushes()
    phone_handling = finger_taps() + finger_strokes() + finger_rub()
    return panel_work + phone_handling + workshop()


def record(dry):
    """The phone thins the deepest bass, clips at full scale and cuts the top."""
    low_cut = signal.butter(4, 42, "highpass", fs=SR, output="sos")
    top_cut = signal.ellip(10, 0.2, 80, 16000, fs=SR, output="sos")
    clipped = np.clip(signal.sosfilt(low_cut, dry), -1, 1)
    return signal.sosfilt(top_cut, clipped)


dry = scene()
out = record(dry)
waveform_to_disk(out)
```